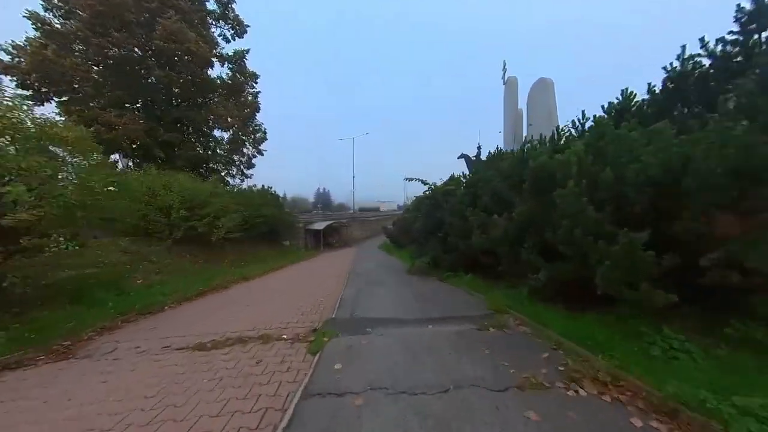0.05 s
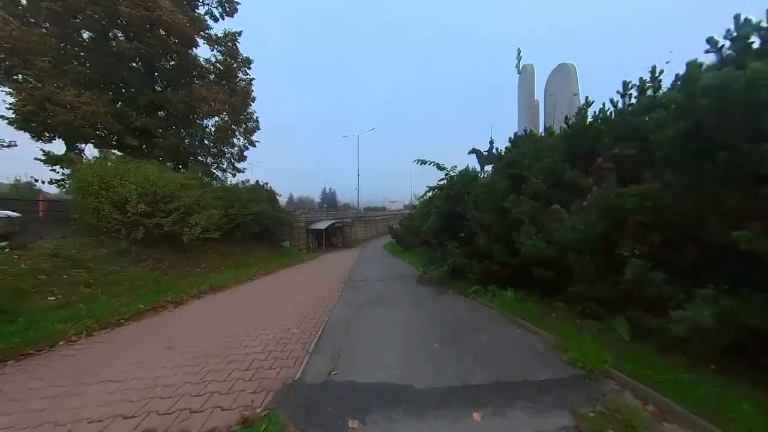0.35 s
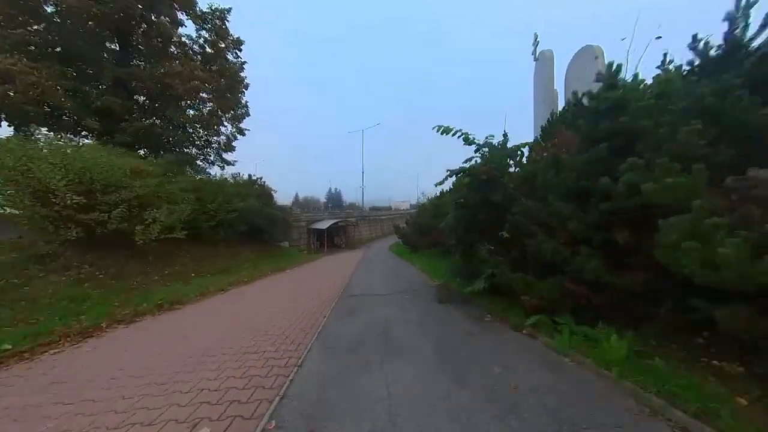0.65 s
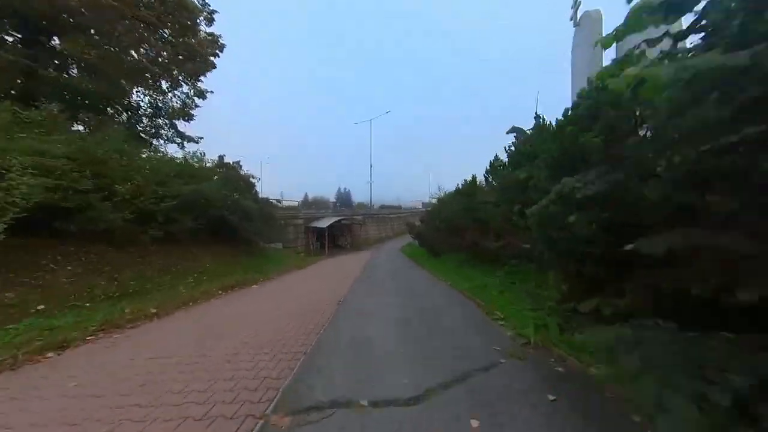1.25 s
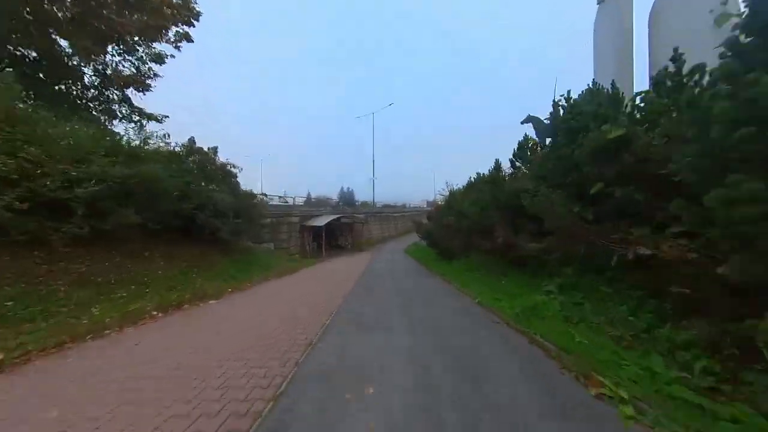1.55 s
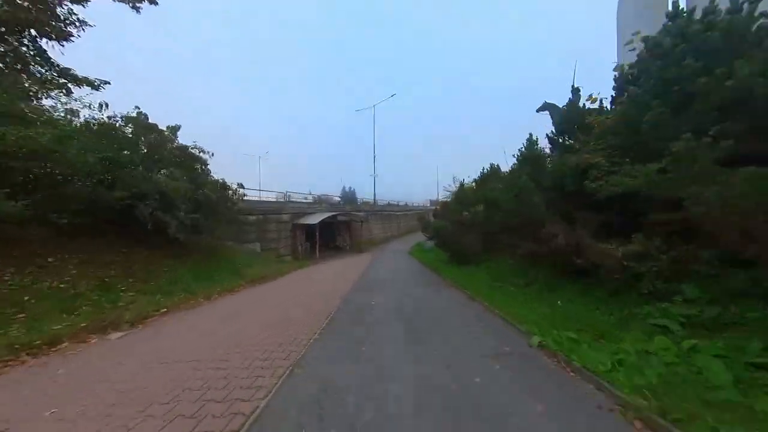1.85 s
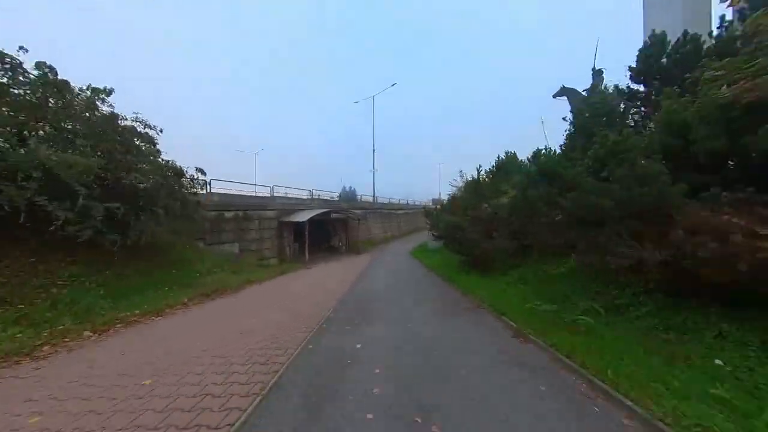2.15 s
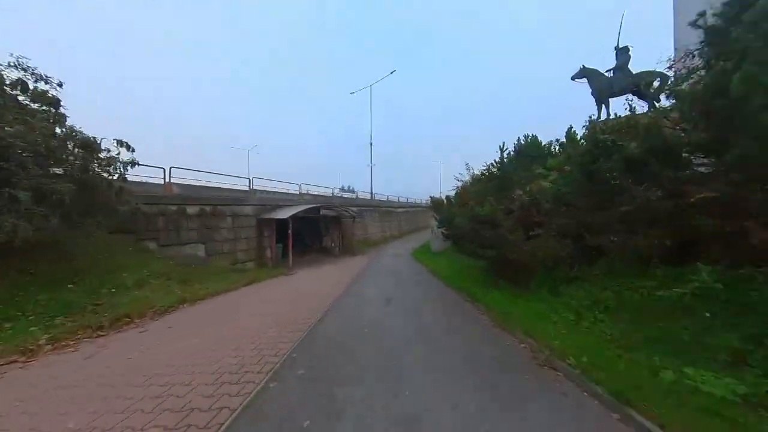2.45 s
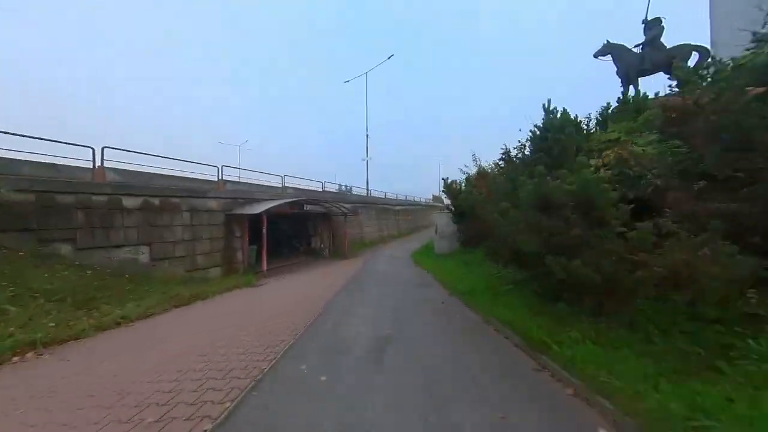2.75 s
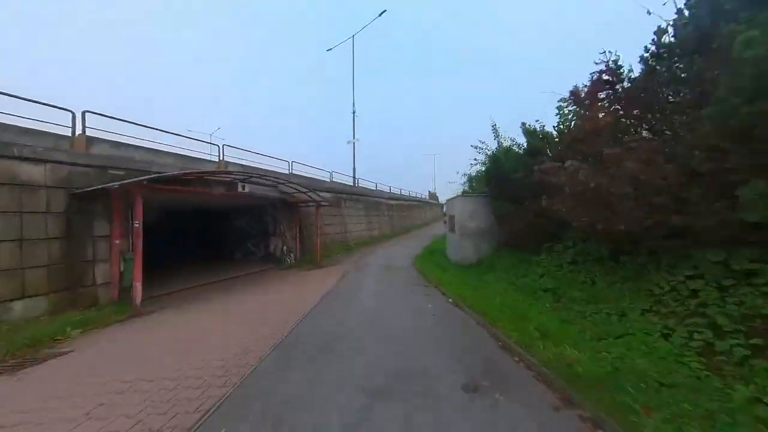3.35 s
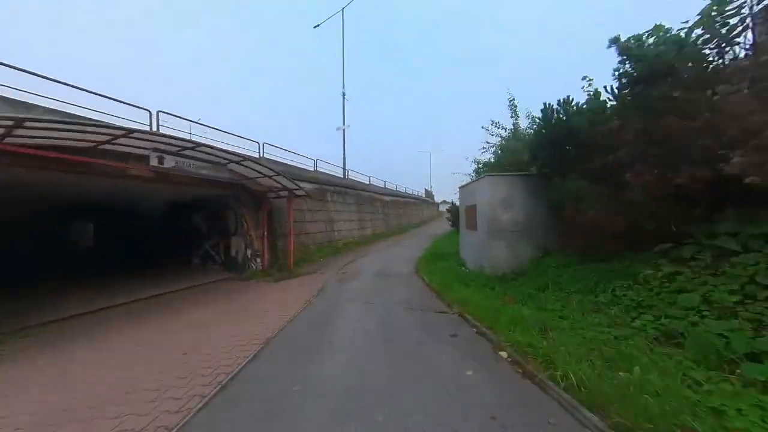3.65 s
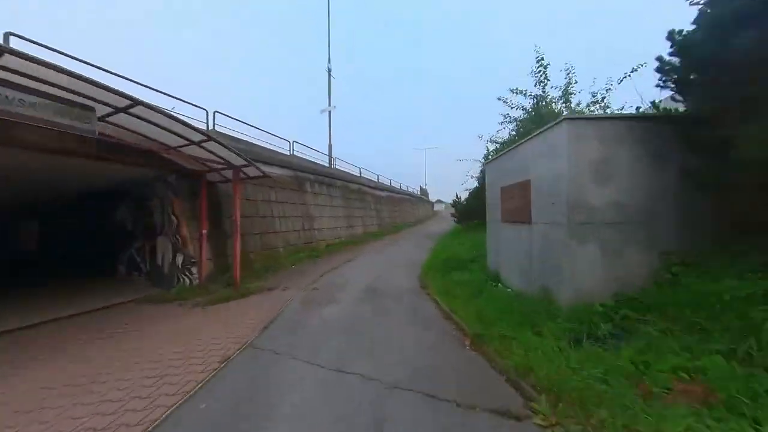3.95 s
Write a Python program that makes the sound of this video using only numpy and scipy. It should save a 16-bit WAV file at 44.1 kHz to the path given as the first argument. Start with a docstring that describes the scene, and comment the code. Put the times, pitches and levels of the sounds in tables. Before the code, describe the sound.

A rolling bicycle thumps and rattles over bumps as wind buffets the microphone.

```python
"""Bicycle coasting on asphalt.

Wind and road shake a camera mounted on the bicycle. The tyres roar softly and hum;
the freewheel ticks finely. Cracks in the asphalt thump the frame, knock loose fittings,
slap the chain against a tube and make a small metal part ping."""
import sys
import numpy as np
from scipy import signal
from scipy.fft import rfft, irfft
from scipy.io import wavfile
from scipy.ndimage import uniform_filter1d

SR = 44100
rng = np.random.default_rng(int(sys.argv[2]) if len(sys.argv) > 2 else 0)


def persist_wave(psi):
    """Save psi, clipped to +-1, as 16-bit WAV."""
    counts = np.round(np.clip(psi, -1, 1) * 32767).astype(np.int16)
    wavfile.write(sys.argv[1], SR, np.atleast_2d(counts).T)


N = 176400

# microphone self-noise: freq_hz, density_db
MIC_HISS_SPECTRUM = [(1000, -31), (2500, -10), (4000, 13), (7000, -1.5)]
# wind and road buffeting: time_s, level_db
RUMBLE_LEVELS = [(0,-34.5),(.4,-36),(.66,-32),(.8,-32),(.98,-33),(1.14,-28.5),(1.42,-33),(1.54,-27),(1.66,-32.5),(1.82,-34),(1.89,-25.5),(1.96,-34),(2.15,-36),(2.55,-34),(3.25,-33),(3.47,-31.5),(3.65,-33),(4,-33)]
# shaken mount: freq_hz, density_db
RUMBLE_SPECTRUM = [(20,-74),(33,-43),(50,-10),(70,-4.5),(105,1),(145,-1.5),(172,0.5),(205,-4.5),(260,-8),(340,-18),(500,-28),(1000,-57)]
# stronger gusts: centre_s, half_width_s, level_db
GUST_SWELLS = [(1.15,0.075,-35),(1.554,0.054,-44),(2.66,.04,-42),(3.51,0.06,-43),(3.945,0.041,-38)]
# wind on the microphone: freq_hz, density_db
GUST_SPECTRUM = [(80,-7),(200,3.5),(300,0.5),(500,-0.5),(800,-18),(2000,-51)]
# tread hum: time_s, level_db
HUM_LEVELS = [(2, -79), (2.4, -45), (3.2, -42.5), (3.6, -47.5), (4, -55)]
# tyre roar: time_s, level_db
TYRE_LEVELS = [(0,-50),(.65,-48.5),(.8,-47),(.98,-47),(1.15,-49.5),(1.32,-48.5),(1.8,-48),(1.9,-46.5),(2.1,-50.5),(2.7,-49.5),(3.2,-48.5),(3.6,-48.5)]
# wheel resonances: freq_hz, density_db
TYRE_SPECTRUM = [(150,-32),(350,-5),(450,0),(560,4),(625,-6),(700,-6.5),(765,3),(825,-3),(875,-0.5),(945,-10),(1100,-10.5),(1250,-16.5),(1480,-10.5),(1650,-11.5),(1810,-17),(1920,-14),(2100,-19),(2330,-18.5),(2620,-25),(2800,-20.5),(3200,-28),(4200,-40),(7000,-44)]
# freewheel ticks and hiss: time_s, gain_db
FREEWHEEL_GAINS = [(0,-0.5),(.7,-0.5),(1.4,2),(2.3,2.1),(3.1,1.2),(4,5)]
# hub resonances: freq_hz, density_db
HUB_SPECTRUM = [(3000,-30),(4300,-22),(4800,-8),(5300,-20),(6200,-24),(7300,-15),(7920,3),(8400,-13),(9350,-10),(9820,1),(10400,-9),(11600,-12),(12400,-5),(13300,4),(14000,-4),(15000,-3),(15600,-8)]
# thin drive hiss: freq_hz, density_db
DRIVE_SPECTRUM = [(2500,-18),(3600,-7),(4350,-15),(4780,-5),(5200,-10),(5900,-14),(7300,-9),(7920,2),(8400,-6),(9300,-3),(9820,2.5),(10500,-2),(11700,-3),(13300,4.5),(14200,0),(15000,1.5),(15600,-1.5)]
# frame jolts: start_s, level_db
FRAME_THUMPS = [(0.238,-24),(.747,-15.5),(0.763,-18.5),(0.808,-23),(1.072,-19),(1.146,-16),(1.218,-22),(1.741,-17),(1.863,-15.5),(1.901,-18.5),(1.992,-23),(2.624,-22.5),(3.008,-23),(3.408,-20),(3.441,-19),(3.478,-18.5),(3.528,-19),(3.983,-17)]
# frame modes: freq_hz, level_db, t60_s
FRAME_RESONANCES = [(130.7,-6,0.17),(158.4,-10,0.28),(243.6,-12.5,0.17),(302,-17.5,0.037)]
# knocks of loose fittings: start_s, level_db, tilt_db_per_octave
FITTING_KNOCKS = [(.104,-34,-5),(0.529,-37,3),(0.545,-35,4),(.725,-32,2),(.748,-24.5,-4),(0.761,-32,-1),(.807,-21.5,-9.5),(.86,-32,2),(.897,-34,-1),(0.964,-34,-2),(.978,-36,0),(1.054,-34,5),(1.154,-29,-12),(1.539,-33,-9),(1.677,-31.5,2),(1.741,-20.7,-1.8),(1.748,-26,-6),(1.863,-28,-10),(1.881,-28,3),(1.902,-31,-3),(2.016,-32.5,-4),(2.862,-31,-.5),(3.425,-35.5,-.5),(3.678,-31.5,-6),(3.724,-31.5,0),(3.772,-36,-2),(3.811,-41,2)]
# fittings chattering after a crack: centre_s, half_width_s, level_db
CHATTER_SWELLS = [(.552,.016,-53),(.765,.05,-52),(.97,.09,-57),(1.7,.035,-58)]
# struck fittings: freq_hz, density_db
FITTING_SPECTRUM = [(250,-22),(480,-2),(640,8),(770,6),(930,-4),(1150,0),(1330,-5),(1520,2.5),(1830,4),(2300,0.5),(2650,-2.5),(3200,-13),(4100,-16),(5600,-9.5),(8000,-17),(15000,-28)]
# chain slaps: start_s, level_db, tilt_db_per_octave, tube_gain_db
CHAIN_SLAPS = [(0.543,-32.5,-8.5,-20),(.564,-31,16,-33),(0.737,-38,-1,7),(0.749,-40,4,3),(0.758,-33,-10.5,-20),(0.824,-37,5,0.5),(0.842,-31,8,-25),(0.861,-29.5,6,-29),(.865,-36.5,-18,6.5),(.911,-33,7,-36),(0.965,-39.5,-18,1),(1.022,-35.5,-6,-11),(1.047,-35.5,-10,0.5),(1.061,-33.5,8,-26),(1.093,-36,3,-32),(1.101,-36,14,-22),(1.366,-41,-5,-24),(1.686,-32.5,14,-5.5),(1.741,-32.5,-2,-16),(1.777,-42,2,-28),(1.937,-41,0.5,-24),(1.973,-38,18,-32),(2.157,-42.5,-1,-10)]
# clashing links: freq_hz, density_db
CHAIN_SPECTRUM = [(1200,-29),(2800,-4),(4200,1),(5600,12),(7000,1.5),(8500,14),(9700,10),(11000,15),(12200,7),(13500,14),(14400,-10),(16000,1)]
# frame tube modes: freq_hz, level_db, t60_s
TUBE_RESONANCES = [(4113,-16,.12),(4550,-13,.15),(4918,-9,.11),(5613,-14,.1),(6810,-11,.19),(7208,-15,.1),(7655,-9,.13),(10300,-4,.05),(10860,-4,.05),(14330,-2,.07)]
# pings of a small loose part: start_s, level_db
PART_PINGS = [(1.051,-38),(1.065,-34),(1.097,-31),(1.102,-28),(1.973,-43)]
# modes of that part: freq_hz, level_db, t60_s
PART_RESONANCES = [(5356,-10.5,.13),(8694,-3,.06),(10350,-1,.04),(10750,0,.035),(11200,-4,.04),(13070,-5,.11),(15200,-9,.06)]

SPOT_RIPPLE_DB = 3  # each blow lands on another spot and favours other resonances
BUZZ_DB, BUZZ_HZ = 4, 350  # loose metal keeps touching its seat
GRIT_DB, GRIT_HZ = 5, 900  # tiny contacts of links and fittings


def undb(db):
    """Decibels to gain."""
    return 10 ** (np.asarray(db) / 20)


def unit(x):
    """Scale to rms 1."""
    return x / np.sqrt(np.mean(x ** 2))


def curve(rows):
    """Gain through (time_s, level_db) points."""
    return undb(np.interp(np.arange(N) / SR, *np.array(rows).T))


def swells(rows):
    """Sum of Gaussian gain bumps."""
    t = np.arange(N) / SR
    return sum(undb(db) * np.exp(-((t - centre_s) / width_s) ** 2) for centre_s, width_s, db in rows)


def colour(x, spectrum, tilt_db_per_octave=0, ripple_db=0, ripple_octaves=.04):
    """Minimum-phase filter with tilt and random ripple; white noise keeps its level."""
    size = 2 * x.shape[-1]
    octave = np.log2(np.maximum(np.fft.rfftfreq(size, 1 / SR), 1))
    hz, db = np.array(spectrum).T
    ripple = np.interp(octave / ripple_octaves, np.arange(256), rng.standard_normal(256))
    tilt_db = tilt_db_per_octave * np.maximum(octave, np.log2(hz[0]))
    gain = unit(undb(np.interp(octave, np.log2(hz), db) + tilt_db + ripple_db * ripple))
    cepstrum = irfft(np.log(gain))
    cepstrum[1:size // 2] *= 2
    cepstrum[size // 2 + 1:] = 0
    return irfft(rfft(x, size) * np.exp(rfft(cepstrum)))[..., :size // 2]


def walk(rate_hz, size=N):
    """Interpolated random values, spread near 1."""
    knots = rng.standard_normal(4096)
    return np.interp(np.arange(size) / SR * rate_hz, np.arange(len(knots)), knots) * np.sqrt(1.5)


def fade(t60_s, size=16384):
    """Exponential decay."""
    return np.exp(-np.log(1000) * np.arange(size) / SR / t60_s)


def soften(envelope, attack_s):
    """Round off the attack."""
    window = np.hanning(int(2 * attack_s * SR) + 3)
    return signal.fftconvolve(envelope, window / window.sum())[:len(envelope)]


def ring(modes, detune, buzz_db=0):
    """Struck modes, detuned per blow, peak 1; buzz makes each flutter."""
    out = 0
    for hz, db, t60_s in modes:
        decay = fade(t60_s)
        flutter = unit(undb(buzz_db * walk(BUZZ_HZ, len(decay))))
        pitch_hz = hz * (1 + detune * rng.standard_normal())
        out += undb(db) * decay * flutter * np.sin(2 * np.pi * pitch_hz * np.arange(len(decay)) / SR)
    return out / np.abs(out).max()


def wide_noise(side_db, size=N):
    """Mid/side stereo noise."""
    mid, side = rng.standard_normal((2, size))
    return mid + undb(side_db) * np.array([side, -side])


def clatter(attack_s, t60_s, tail_db, tail_t60_s, side_db, flutter_db=4, flutter_hz=300):
    """Noise burst with a softer, fluttering tail."""
    burst = fade(t60_s)
    tail = undb(tail_db + flutter_db * walk(flutter_hz, len(burst))) * fade(tail_t60_s)
    return soften(burst + tail, attack_s) * wide_noise(side_db, len(burst)) / 2


def add(out, start_s, sound):
    """Mix a sound in at start_s."""
    start = min(max(int(start_s * SR), 0), N - 1)
    out[:, start:start + sound.shape[-1]] += sound[..., :N - start]


def mic_hiss(level_db=-73.5):
    """Faint microphone hiss, unrelated left and right."""
    return undb(level_db) * colour(rng.standard_normal((2, N)), MIC_HISS_SPECTRUM)


def rumble(gain_db=-.5, flutter_db=2, flutter_hz=60, window_s=.09):
    """Wind and road buffet the mount in quick, uneven pushes."""
    pushes = colour(rng.standard_normal(N) * undb(flutter_db * walk(flutter_hz)), RUMBLE_SPECTRUM)
    running_rms = np.sqrt(uniform_filter1d(pushes ** 2, int(window_s * SR)))
    return pushes / running_rms * curve(RUMBLE_LEVELS) * undb(gain_db)


def gusts():
    """Gusts hit the microphone, brighter than the rumble."""
    return swells(GUST_SWELLS) * colour(rng.standard_normal(N), GUST_SPECTRUM)


def tread_hum(pitch_hz=257.2, waver=.0247, waver_hz=40, flutter_db=3, flutter_hz=25):
    """The tread hums unsteadily on smooth asphalt."""
    phase = 2 * np.pi * np.cumsum(pitch_hz * (1 + waver * walk(waver_hz))) / SR
    return unit(np.sin(phase) * undb(flutter_db * walk(flutter_hz))) * curve(HUM_LEVELS)


def tyres(patch_db=1.5, patch_hz=25, grain_db=2, grain_hz=500):
    """Patches and grain of the asphalt excite the wheel resonances."""
    roughness_db = patch_db * walk(patch_hz)
    contact = rng.standard_normal(N) * undb(roughness_db + grain_db * walk(grain_hz))
    return unit(colour(contact, TYRE_SPECTRUM)) * curve(TYRE_LEVELS)


def freewheel(rate_hz=90, jitter=.4, tick_db=-62, spread_db=3.5, hiss_db=-60.9, whirr_db=1.84):
    """Quick, uneven ticks ring the hub over a thin, whirring hiss."""
    gaps, strengths = rng.standard_normal((900, 2)).T
    times_s = np.cumsum(np.exp(jitter * gaps)) / rate_hz
    heard = times_s < N / SR
    pulses = np.zeros(N)
    pulses[(times_s[heard] * SR).astype(int)] = undb(spread_db * np.minimum(strengths[heard], 1))
    envelope = soften(fade(t60_s=.009), attack_s=.0015)
    bursts = unit(signal.fftconvolve(pulses, envelope)[:N])
    ticks = colour(rng.standard_normal(N) * bursts, HUB_SPECTRUM)
    hiss = colour(wide_noise(side_db=-17), DRIVE_SPECTRUM) * undb(whirr_db * walk(rate_hz=150))
    return curve(FREEWHEEL_GAINS) * (undb(tick_db) * ticks + undb(hiss_db) * hiss)


def chatter():
    """Dense, tiny contacts of the shaken fittings between knocks."""
    contacts = wide_noise(side_db=-11) * undb(GRIT_DB * walk(GRIT_HZ))
    return swells(CHATTER_SWELLS) * unit(colour(contacts, FITTING_SPECTRUM, tilt_db_per_octave=5))


def thumps():
    """Cracks jolt the low modes of the frame."""
    out = np.zeros((2, N))
    for start_s, db in FRAME_THUMPS:
        add(out, start_s, undb(db) * ring(FRAME_RESONANCES, detune=.15))
    return out


def knocks(attack_s=.0008):
    """Bumps knock the loose fittings."""
    out = np.zeros((2, N))
    for start_s, db, tilt in FITTING_KNOCKS:
        blow = clatter(attack_s, t60_s=.024, tail_db=-29, tail_t60_s=.24, side_db=-22)
        add(out, start_s - attack_s, undb(db) * colour(blow, FITTING_SPECTRUM, tilt, SPOT_RIPPLE_DB))
    return out


def chain(attack_s=.0017):
    """The chain slaps a frame tube with a gritty clash of links; the tube rings."""
    out = np.zeros((2, N))
    for start_s, db, tilt, tube_gain_db in CHAIN_SLAPS:
        links = clatter(attack_s, t60_s=.017, tail_db=-13.5, tail_t60_s=.21, side_db=-11)
        grit = unit(undb(GRIT_DB * np.minimum(walk(GRIT_HZ, links.shape[-1]), 1)))
        slap = colour(links * grit, CHAIN_SPECTRUM, tilt, SPOT_RIPPLE_DB)
        tube = ring(TUBE_RESONANCES, detune=.002, buzz_db=BUZZ_DB)
        add(out, start_s - attack_s, undb(db) * slap)
        add(out, start_s, undb(db + tube_gain_db) * tube)
    return out


def pings():
    """A small metal part rings and buzzes against its seat."""
    out = np.zeros((2, N))
    for start_s, db in PART_PINGS:
        add(out, start_s, undb(db) * ring(PART_RESONANCES, detune=.003, buzz_db=BUZZ_DB))
    return out


def scene():
    """Stereo mix, bicycle near the centre."""
    riding = rumble() + gusts() + tyres() + tread_hum() + freewheel()
    impacts = thumps() + knocks() + chain() + pings() + chatter()
    return riding + impacts + mic_hiss()


def record(dry, low_hz=44, top_hz=15780):
    """The camera cuts the deepest bass and the top."""
    highpass = signal.butter(4, low_hz, "high", fs=SR, output="sos")
    lowpass = signal.ellip(12, .2, 80, top_hz, fs=SR, output="sos")
    return signal.sosfilt(lowpass, signal.sosfilt(highpass, dry))


dry = scene()
out = record(dry)
persist_wave(out)
```